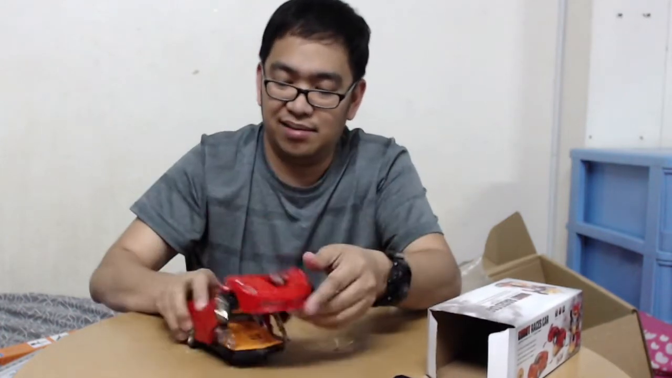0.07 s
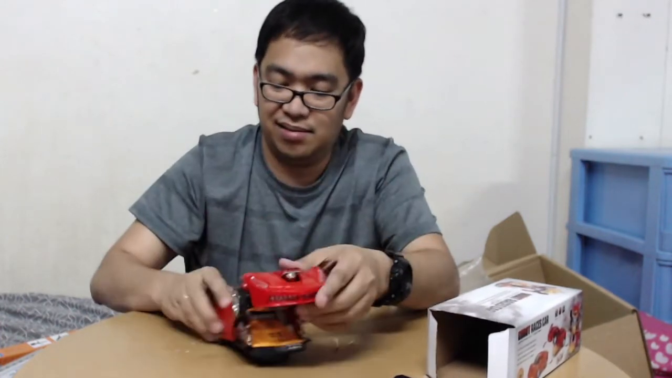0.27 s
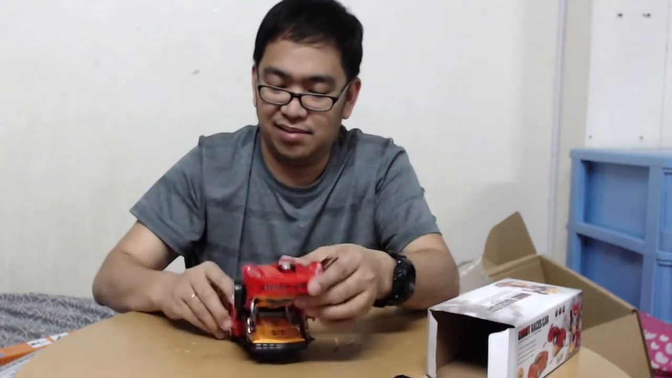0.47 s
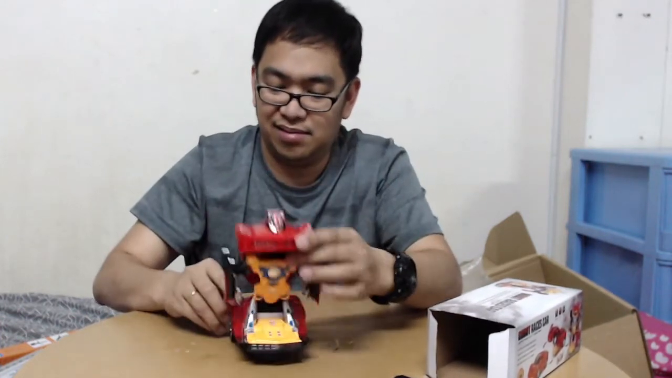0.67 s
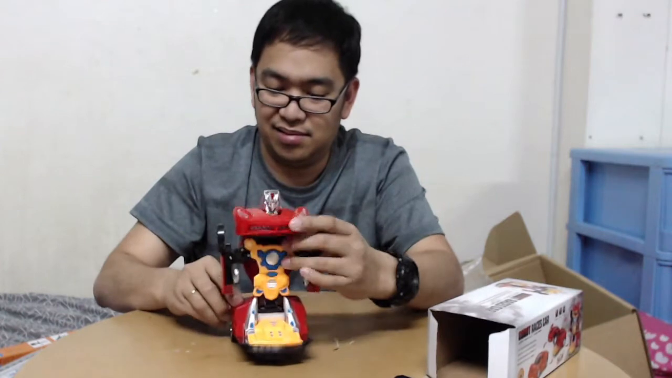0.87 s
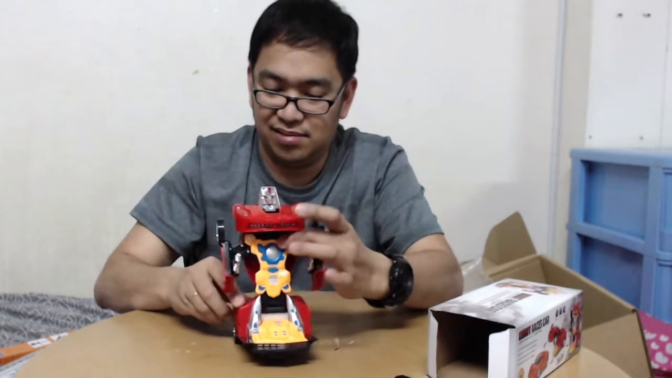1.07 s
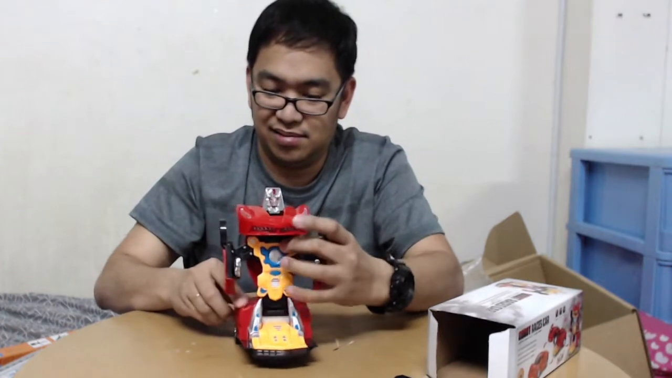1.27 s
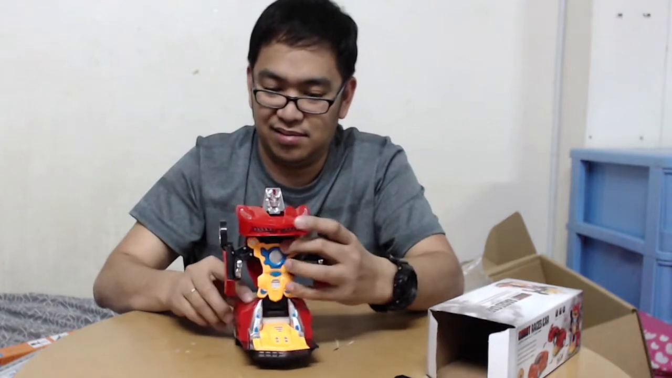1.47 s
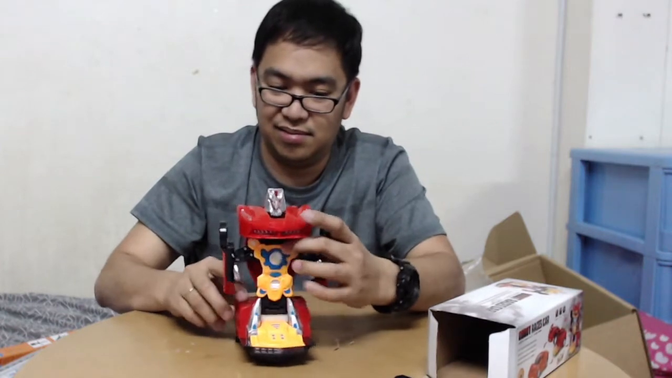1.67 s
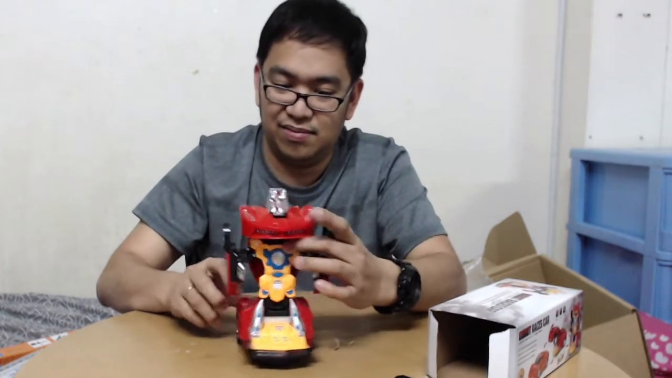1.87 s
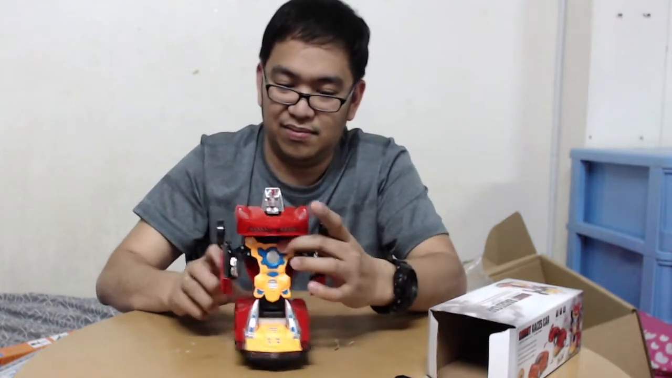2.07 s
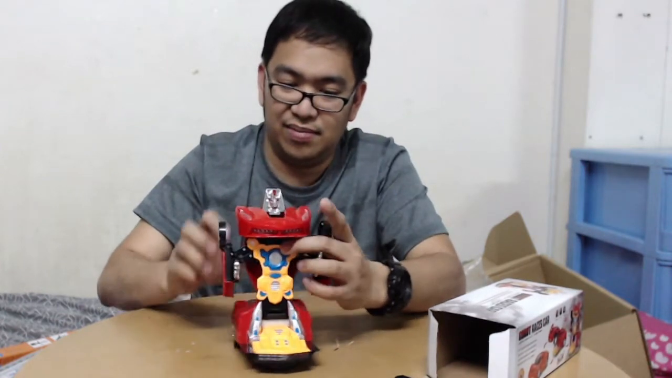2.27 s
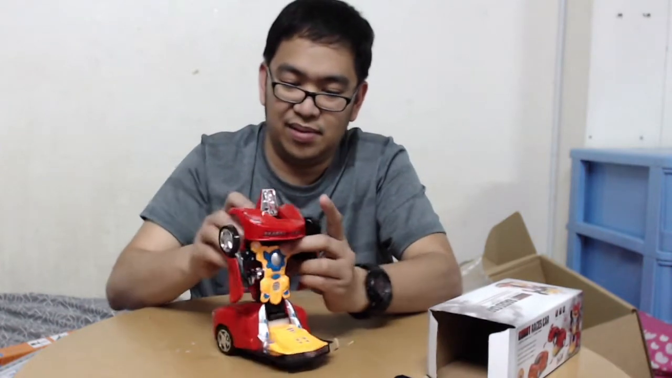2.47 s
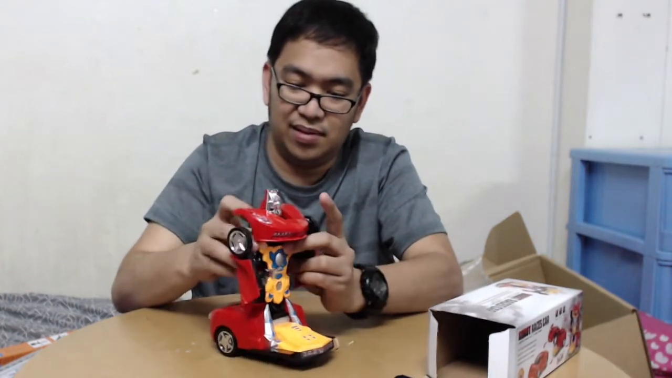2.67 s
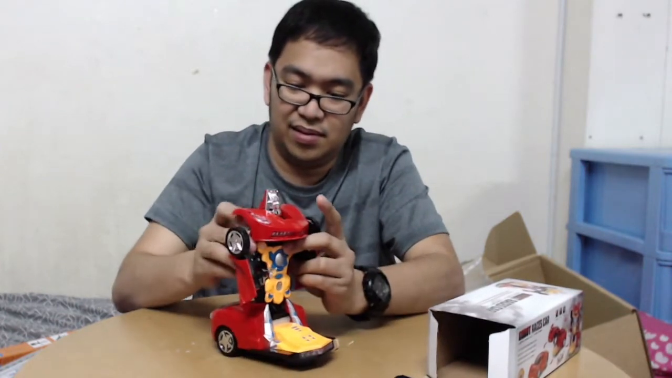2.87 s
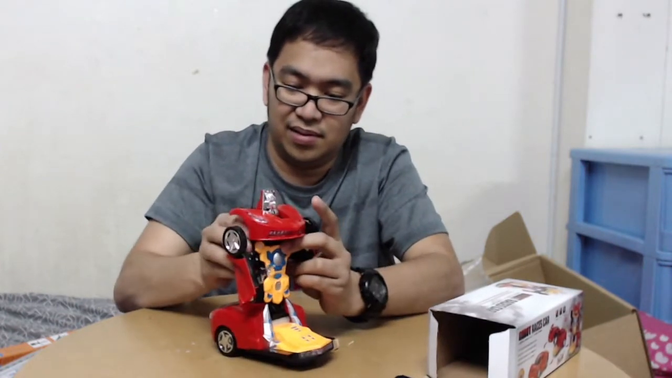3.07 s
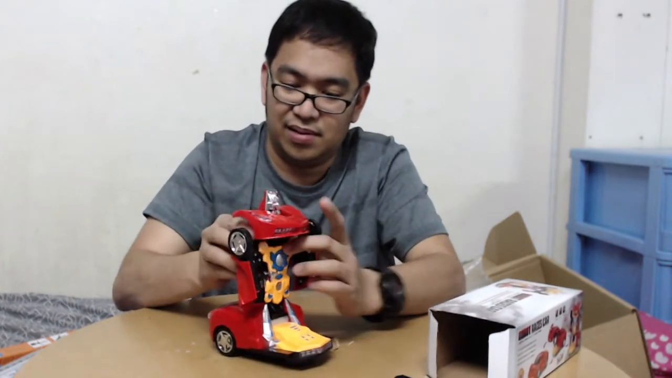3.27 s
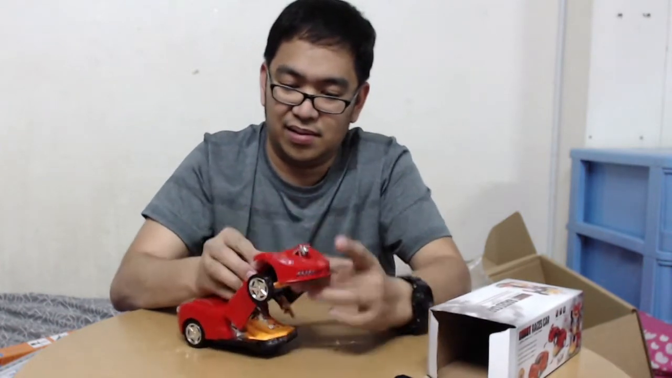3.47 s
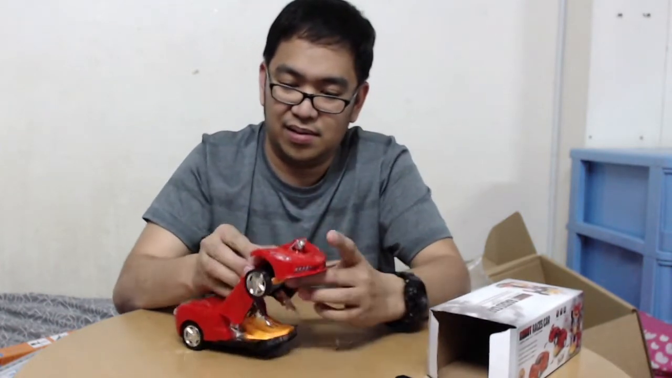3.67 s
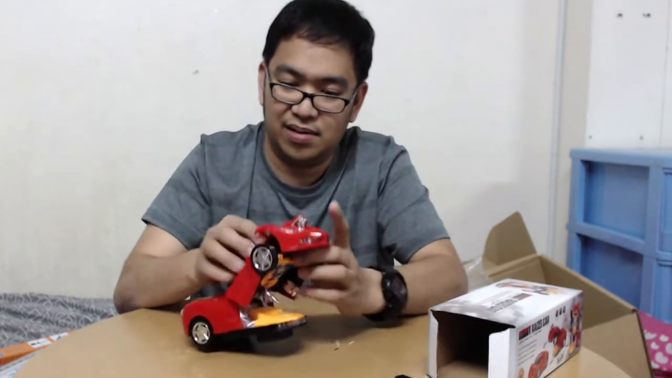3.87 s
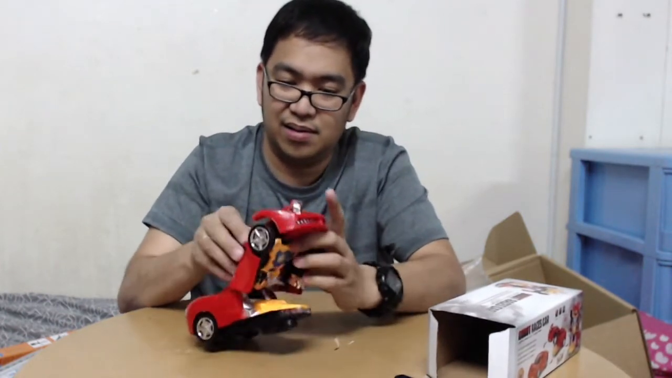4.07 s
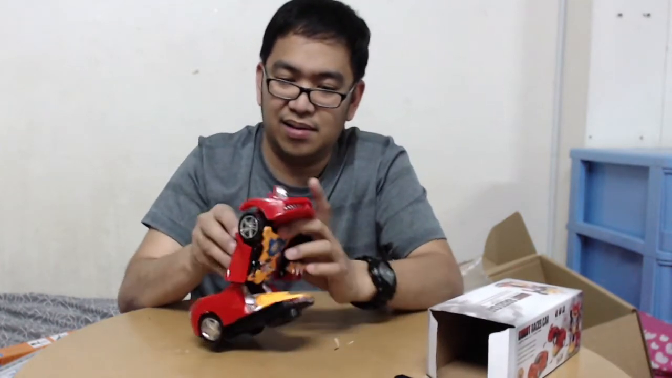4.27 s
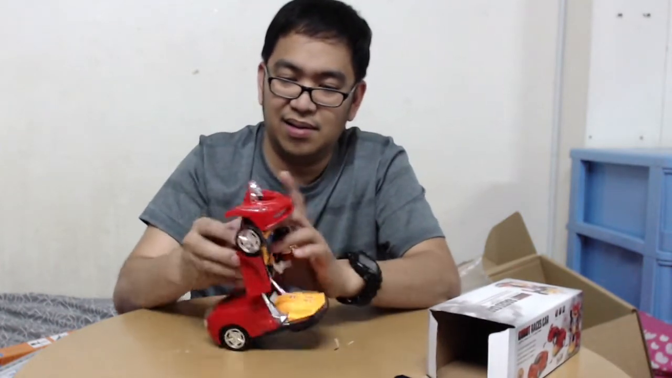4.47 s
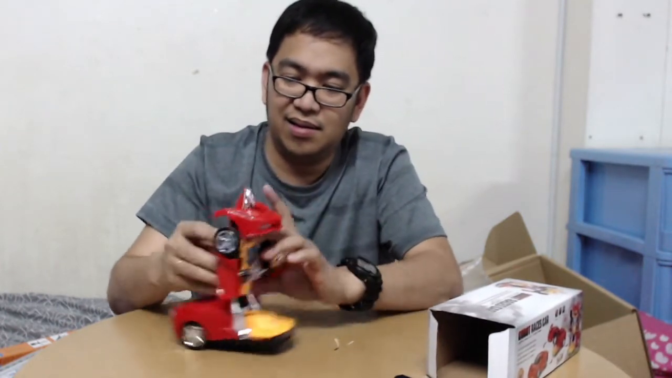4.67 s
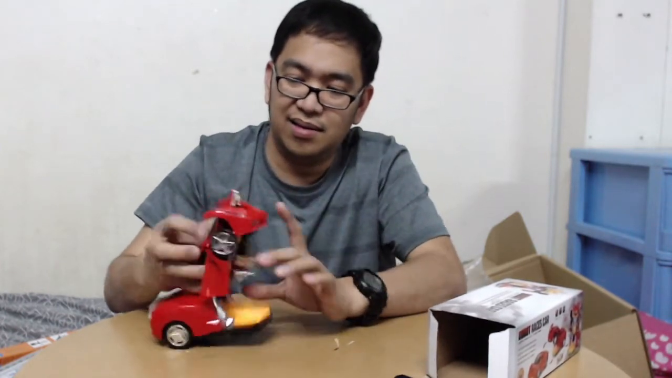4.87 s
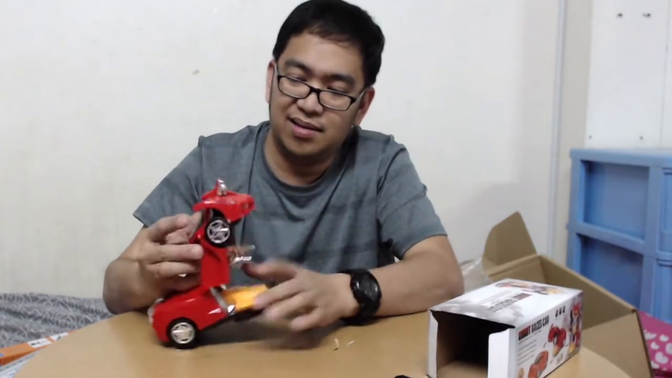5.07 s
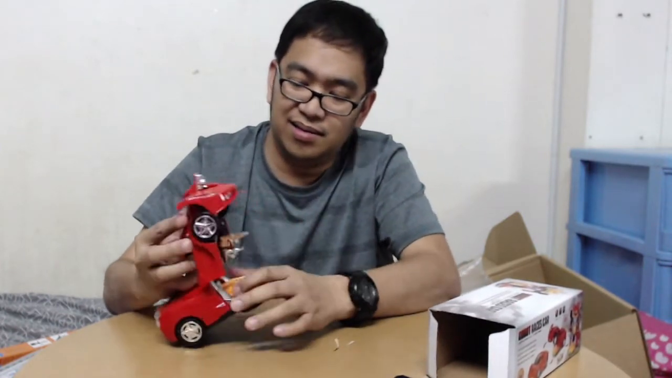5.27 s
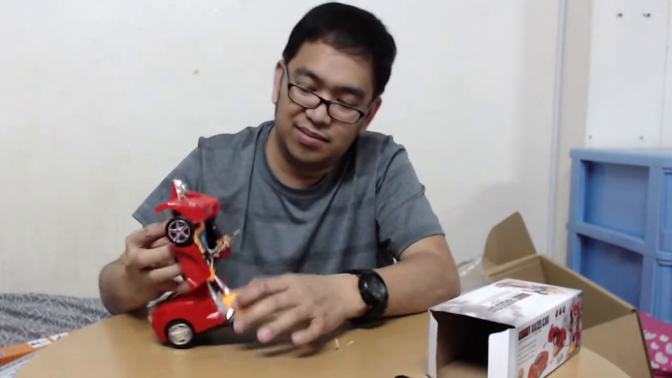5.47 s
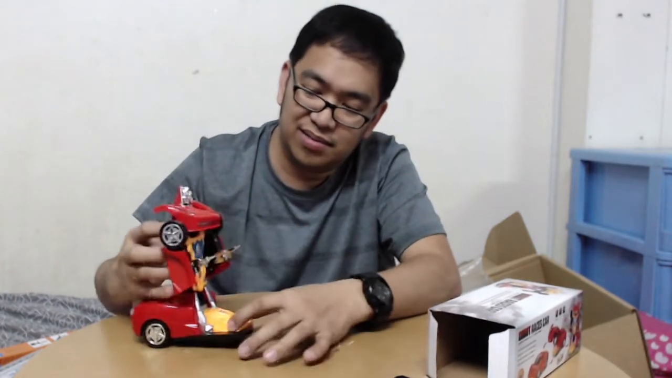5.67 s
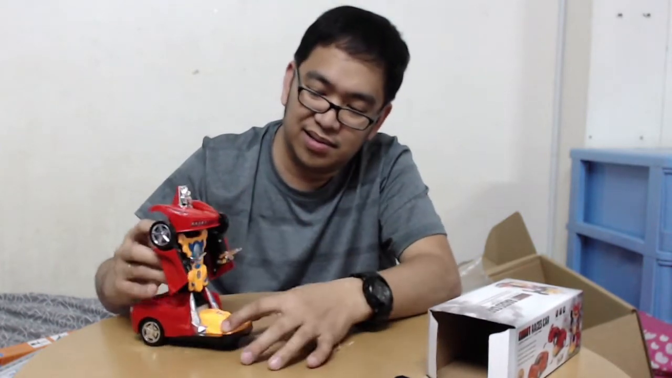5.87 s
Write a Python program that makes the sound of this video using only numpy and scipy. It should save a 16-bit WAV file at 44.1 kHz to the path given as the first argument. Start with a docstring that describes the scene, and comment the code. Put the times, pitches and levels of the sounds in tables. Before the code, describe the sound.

A hollow plastic toy car-robot is folded by hand on a light tabletop. A couple of knocks open, then a dense rattling cluster of clicks near one second, softer fumbling, sharp clacks past the middle, and a very loud snap near the end. Small room, fairly close microphone, faint low hum and hiss.

```python
"""Snaps, knocks and rattles of a hollow plastic toy car, folded and twisted by hands on a light table.
Each contact shakes the resonant parts of the toy and rings the part that was struck.
Rubbing joints and wheels add narrow squeaks, and a few ticks add bright crackle.
Bumps and dragging wheels make the table top boom in a few low modes.
Behind it lie a small room's echo and the steady noise of room and microphone."""
import sys
import numpy as np
from scipy import signal
from scipy.fft import rfft, irfft, next_fast_len
from scipy.io import wavfile
from scipy.ndimage import uniform_filter1d, map_coordinates

SR = 44100
rng = np.random.default_rng(int(sys.argv[2]) if len(sys.argv) > 2 else 0)


def bounce(signal):
    """Save signal as a 16-bit WAV file at the path given by the first command-line argument."""
    frames = np.transpose(np.atleast_2d(signal))
    limited = np.clip(frames, -1, 1)
    pcm = np.round(limited * 32767).astype(np.int16)
    wavfile.write(sys.argv[1], SR, pcm)


N = 260498

# Knocks and snaps in the toy; the last two are shares of the hollow body and the small loose parts:
# start_s, relative_level_db, struck_part_pitch_hz, body_share_db, small_parts_share_db
CONTACTS = [(.003, -4.5, 1572, -11.5, -28), (.093, -9.5, 1560, -6, -23), (0.175, -17.5, 1830, -5.5, -35),
            (.186, -19.5, 6900, -21, -14), (.22, -25, 1540, -19, -25), (.364, -32.5, 580, 1.5, -29),
            (.375, -20, 650, -5.5, -34), (.561, -26, 773, 0, -10.5), (.693, -28, 755, -18, -33),
            (.784, -23.5, 3670, -9.5, -11), (0.851, -11.5, 3090, -11, -12.5),
            (.871, -6.5, 2890, -5.5, -6.5), (.902, -11, 3680, -16, -11), (.954, -10.5, 2290, -20, -18),
            (.965, -11, 2200, -19, -12), (0.996, -10, 1600, -9.5, -19), (1.027, -12, 3410, -40, -10),
            (1.091, -21.5, 2010, -30, -9.5), (1.142, -25, 680, -9.5, -24), (1.164, -25, 680, -0.5, -48),
            (1.187, -20.5, 665, -7.5, -13), (1.254, -22, 670, -5, -21), (1.269, -9, 2820, -16.5, -6),
            (1.42, -28, 517, -12, -13), (1.668, -18, 640, -7, -16), (1.688, -29, 580, -23, -12),
            (1.749, -18.5, 893, -10.5, -41), (1.847, -25, 630, -9, -29), (1.875, -21, 910, -5, -19),
            (1.911, -18.5, 680, -2, -21), (1.936, -19, 1600, -19, -20), (1.985, -16, 670, -4.5, -28),
            (2.009, -15.5, 665, -15, -16.5), (2.055, -16, 716, -11.5, -16.5),
            (2.077, -23.5, 3120, -17, -15), (2.264, -26, 610, -27, -18), (2.296, -29, 3090, -16, -16),
            (2.311, -32, 630, -14, -21), (2.348, -25, 564, -9, -20), (2.378, -34, 1200, 7, -15),
            (2.449, -31, 1900, -3, -7), (2.462, -24, 1900, -5, -8.5), (2.669, -26, 3570, -21, -18),
            (3.076, -23.5, 570, -15, -16), (3.162, -22.5, 927, -17, -17), (3.232, -26.5, 2500, -23, -4.5),
            (3.274, -34, 1010, -21, -15), (3.324, -30, 937, 4.5, -21), (3.351, -6, 1970, -9, -16),
            (3.401, -6, 946, -11, -12.5), (3.413, -3.5, 623, -11.5, -13.5), (3.555, -31.5, 918, 1, -25),
            (3.639, -34, 726, 1, -16), (3.661, -15.5, 780, -12.5, -16), (3.866, -23, 730, -7, -5),
            (3.886, -11.5, 6300, -7, -2), (3.892, -10.5, 2980, -33, 2), (3.901, -6, 3400, -17, -3.5),
            (4.234, -21.5, 4400, -16, -4.5), (4.248, -16.5, 3500, -34, -6), (4.32, -25, 900, -4.5, -21),
            (4.395, -7, 1945, -9.5, -25), (4.441, -23, 6720, -12, 3), (4.475, -26, 3500, -15, -2),
            (4.53, -24, 880, 3.5, -30), (4.564, -18.5, 950, 0.5, -11), (4.578, -15, 2900, -1.5, -11.5),
            (4.597, -16.5, 900, -6.5, -22), (4.636, -9, 900, -7, -29), (4.649, -3.5, 1906, -7, -21),
            (4.676, -6.5, 3394, -25, -6), (4.721, -24.5, 2430, -16, 3), (4.793, -24.5, 875, -2, -20),
            (4.892, -13.5, 1805, -8.5, -13.5), (5.009, -35, 725, -22, -0.5),
            (5.124, -18.5, 2950, -26, -5.5), (5.13, -13.5, 1420, -15, -16), (5.195, -14, 3250, -25, -4.5),
            (5.207, -16, 3330, -25, -18), (5.285, -9, 5850, -25, -7), (5.296, -11, 3610, -21, -15),
            (5.409, -26, 800, 1, -22), (5.465, -17, 835, 0.5, -13), (5.508, 7, 1830, -19, -21),
            (5.512, -9, 2250, -33, -15), (5.524, -10.5, 795, -13, -10), (5.684, -26, 3830, -11, -12)]
# Bumps on the table: start_s, relative_level_db, second_mode_share_db, upper_modes_share_db
BUMPS = [(.002, -29, 5, -29), (.028, -33, 7, -12), (.178, -17, -24, -15), (.212, -26, -5, -2),
         (0.287, -26, -7, -18), (.37, -21.5, -20, -9), (0.565, -37.5, -24, 7), (0.853, -13, -7, -6),
         (0.878, -30, 2, -16), (0.918, -12, -8, -21), (0.998, -19.5, -14, -7.5), (1.172, -25, -16, -3),
         (1.249, -17.5, -18, -6), (1.291, -19, -4.5, -9.5), (1.597, -24.5, -12, -19), (1.666, -11, -13, -8),
         (1.699, -22, -1, -10), (1.864, -13, -12, -17), (1.91, -16, -23, -3), (1.996, -21, -21, -6),
         (2.052, -11, -15, -8), (2.079, -18.5, -0.5, -7), (2.288, -35, -21, 2), (2.359, -25, -25, -0.5),
         (2.429, -25, -4.5, -7), (2.498, -23.5, -13, -12), (2.796, -31.5, -9, -16), (3.038, -23, -12, -9.5),
         (3.263, -29, -24, -28), (3.349, -8, -8.5, -10), (3.402, -10, -3, -6), (3.548, -36.5, -23, 9),
         (3.643, -23, -24, -5), (3.906, -20.5, -31, -3.5), (4.226, -31.5, -27, 2), (4.401, -18, -8, -4),
         (4.531, -27, -23, -8), (4.58, -28, -30, 0), (4.654, -9, -15, -6), (4.719, -13.5, -6.5, -6.5),
         (4.789, -19, -12, -13), (5.051, -27, -21, -2), (5.266, -33, -25, 1), (5.4, -23, -27, -1.5),
         (5.464, -25, -25, 8.5), (5.519, -9, -26, -9), (5.548, -7.5, -9, -12), (5.577, -8.5, -23, -15),
         (5.684, -33.5, 4.5, -17)]
# Shoves that rock the whole table in its first mode: start_s, relative_level_db
ROCKS = [(.854, -25), (1.0, -42), (3.402, -31), (4.831, -29), (5.562, -32), (5.684, -33)]
# Rub of fingers, joints and wheels: time_s, table_drag_db, toy_rub_db, body_share_db (relative levels)
HANDLING = [(0, -18, -22, -14), (.11, -37.5, -57, 15.5), (.23, -27, -30.5, 0.5), (.4, -32.5, -54, 6.5),
            (.8, -47.5, -50, -1.5), (.97, -25, -28.5, -22), (1.08, -47, -59, -16), (1.63, -46.5, -53.5, 7),
            (1.688, -22, -33.5, -6), (1.81, -38, -79, -1), (1.889, -30.5, -34.5, 2.5), (2.2, -31, -63, 6),
            (2.3, -39.5, -42, 6.5), (2.41, -35.5, -43.5, 4), (2.5, -34, -42, 0.5), (2.67, -52, -58, -2),
            (2.89, -61, -45.5, -6.5), (3.05, -30.5, -51.5, 0), (3.24, -41.5, -51, -0.5),
            (3.342, -26, -29.5, -1), (3.53, -35, -44.5, 1), (3.7, -35, -50, 7), (3.95, -38, -36, -10),
            (4.2, -52.5, -55.5, 2), (4.29, -34.5, -41.5, 2.5), (4.52, -32, -41.5, -11),
            (4.62, -21, -32.5, 3.5), (4.74, -21.5, -27, -4.5), (4.94, -45.5, -48, 5.5),
            (5.17, -34, -38.5, -1.5), (5.38, -41.5, -40, -4), (5.48, -20, -33.5, 8), (5.56, -31, -32, -6),
            (5.68, -50, -63, 5.5), (5.91, -58, -49, -4.5)]
# A joint or wheel rubs and hisses at the pitch of one part: start_s, end_s, pitch_hz, level_db
SQUEAKS = [(0.177, 0.258, 7000, -39), (0.326, 0.443, 7140, -60), (0.952, 0.987, 5570, -23.5),
           (1.298, 1.39, 2850, -42.5), (1.907, 1.98, 11100, -54), (1.997, 2.056, 6700, -51),
           (2.313, 2.435, 7040, -49.5), (2.65, 2.743, 3670, -49.5), (2.807, 3.03, 2460, -50.5),
           (3.186, 3.303, 2480, -46.5), (3.347, 3.463, 6900, -35), (3.384, 3.524, 11040, -49.5),
           (3.46, 3.527, 5100, -44), (3.817, 3.905, 6330, -47), (4.003, 4.087, 6000, -48),
           (4.444, 4.55, 3600, -38), (4.631, 4.72, 7130, -33), (4.799, 4.984, 3500, -35.5),
           (5.193, 5.258, 9100, -44), (5.29, 5.382, 6560, -48), (5.674, 5.764, 3930, -55),
           (5.804, 5.887, 3020, -57)]
# Very short, bright ticks of a fingernail or pin: start_s, relative_level_db
TICKS = [(0.7832, -25), (1.6925, -26), (4.1037, -16.5), (5.878, -46)]
# Resonances, all with the columns: pitch_hz, width_hz, relative_level_db
# Hollow body of the toy
BODY_MODES = [(413, 33, 0.5), (498.5, 88, 1.5), (642, 160, -0.5), (744, 175, 0), (937, 104, 1),
              (1200, 306, -3), (1570, 530, -5.5)]
# Roof and floor panels
PANEL_MODES = [(1600, 770, -5), (2002, 180, 3.5), (2143, 145, 3), (2650, 490, 0)]
# Doors and arms
FLAP_MODES = [(3004, 346, -1.5), (3500, 580, 1), (4180, 1640, -7.5)]
# Small loose parts
SMALL_MODES = [(4360, 820, -1.5), (5840, 1080, 2), (7000, 1590, 0.5), (8870, 2020, -8)]
# Thin edges and pins
EDGE_MODES = [(9850, 640, 5), (11070, 1300, 0.5), (12600, 1300, -6), (15100, 960, -29)]
# Table top
TABLE_MODES = [(84.4, 4, -4.5), (122.9, 5.9, 0.5), (158.4, 4.06, -1.5), (217.4, 15.8, 0.5),
               (279.2, 8.6, -3.5), (308.2, 13.6, -2)]
# Time for the room's echo to fall by 60 dB: pitch_hz, fall_time_s
ROOM_DECAY = [(100, 0.08), (700, 0.18), (1900, 0.2), (5000, 0.22), (13000, 0.21)]
# Colour of the room and microphone noise: pitch_hz, relative_level_db_per_hz
QUIET_COLOUR = [(15, -32), (25, -9.5), (141, 2.5), (438, -20), (675, -14.5), (1010, -24), (1160, -25),
                (1360, -23), (2470, -18), (3700, -22.5), (8110, -25), (15900, -41)]

QUIET_DB = -46.5  # average level of that noise
TOP_HZ = 16000  # nothing sounds above this
PANEL_DB, FLAP_DB, RING_DB = -9, -4, -13  # starting shares, before the adjustments below
FALL_DB_PER_OCTAVE = 2.5  # panels and flaps answer less the further the struck part's pitch is from theirs
# Thin edges rattle with the small parts; flaps follow them by a fraction of their dB share
EDGES_UNDER_SMALL_DB, FLAPS_FOLLOW_SMALL = 17.5, 0.38
RING_YIELDS = 0.49  # the more a contact shakes body and small parts, the less the struck part rings
SMALL_RUB_DB = -6  # the small parts rub along with the panels
FIRST_MODE_DB, THIRD_MODE_DB = -26.5, -3.5  # shares alike for every bump
PUSH_DB = 26.5  # strength of a one-sample push behind a table level of 0 dB
SQUEAK_WIDTH = .075  # half width of a squeak, as a share of its pitch


def toy(rub):
    """Each contact is a blow and a short rattle into the shell, and rings the part that was struck."""
    t = np.arange(SR // 6) / SR
    # Rows everywhere: body, panels, flaps, small parts, edges; the big parts take most of the blow
    hardness = np.array([[2.2], [1.8], [.9], [.5], [.5]])
    blow = hardness * np.exp(-t / 0.00087) * (1 - np.exp(-t / 0.000091))
    # The treble swells in more slowly, over a few milliseconds
    swell_s = np.array([[.0005], [.001], [.002], [.003], [.003]])
    fade_s = np.array([[.01], [.011], [.013], [.014], [.013]])
    rattle = np.exp(-t / fade_s) * (1 - np.exp(-t / swell_s))
    shake = blow + rattle

    force, rings = np.zeros((5, N + SR)), np.zeros(N + SR)
    for start_s, db, hz, body_db, small_db in CONTACTS:
        at = round(start_s * SR)
        gain = amp(db - 5.5 + shares(hz, body_db, small_db)[:, None])
        force[:, at:at + len(t)] += gain * shake * grains(shake.shape, spread_db=3)

        shaken_power = amp(2 * body_db) + amp(2 * small_db)
        ring_db = RING_DB - RING_YIELDS * 10 * np.log10(shaken_power)
        waver = 0.081 * np.cumsum(rng.standard_normal(len(t)))  # plastic rings impurely
        swing = (1 - np.exp(-t * hz * 14.0)) * np.sin(2 * np.pi * hz * t + waver)
        rings[at:at + len(t)] += amp(db + ring_db - 60 * t / 0.039) * swing

    rub_force = rub[[0, 1, 1, 2, 2]] * amp([[0], [-3], [-3], [0], [-15]])
    force = force[:, :N] + rub_force
    parts = BODY_MODES, PANEL_MODES, FLAP_MODES, SMALL_MODES, EDGE_MODES
    shell = sum(resonate(push, modes) for push, modes in zip(force, parts))
    return patchy(shell, depth_db=2.2) + rings[:N]


def shares(hz, body_db, small_db):
    """Split a contact between body, panels, flaps, small parts and edges, in dB."""
    # Distance in pitch is taken from the second resonance of each group
    panels_away_db, flaps_away_db = [FALL_DB_PER_OCTAVE * abs(np.log2(hz / modes[1][0]))
                                     for modes in (PANEL_MODES, FLAP_MODES)]
    panel_db = PANEL_DB - panels_away_db
    flap_db = FLAP_DB - flaps_away_db + FLAPS_FOLLOW_SMALL * small_db
    return np.array([body_db, panel_db, flap_db, small_db, small_db - EDGES_UNDER_SMALL_DB])


def patchy(x, depth_db):
    """The grip keeps changing which parts are free to sound: random patches of gain in pitch and time."""
    spectrum = signal.stft(x, nperseg=256)[2]
    field = uniform_filter1d(rng.standard_normal(spectrum.shape), size=4, axis=0)
    field = uniform_filter1d(field, size=16, axis=1)
    return signal.istft(spectrum * amp(depth_db * unit(field)), nperseg=256)[1][:N]


def squeaks():
    """Rubbing makes grainy noise in a narrow band, which starts quickly and fades more slowly."""
    out = np.zeros(N + SR)
    for start_s, end_s, hz, db in SQUEAKS:
        progress = np.linspace(0, 1, round((end_s - start_s) * SR))
        limits_hz = [hz * (1 - SQUEAK_WIDTH), hz * (1 + SQUEAK_WIDTH)]
        band = signal.butter(2, limits_hz, "bandpass", fs=SR, output="sos")
        hiss = unit(signal.sosfilt(band, grains(len(progress), spread_db=4)))
        out[round(start_s * SR):][:len(progress)] += amp(db) * hiss * np.sin(np.pi * progress ** 0.5)
    return out[:N]


def ticks():
    """Each tick is a few milliseconds of crackle: fading noise, made bright by taking differences."""
    t, out = np.arange(SR // 50) / SR, np.zeros(N + SR)
    for start_s, db in TICKS:
        crackle = np.diff(rng.standard_normal(len(t) + 1))
        out[round(start_s * SR):][:len(t)] += amp(db - 12.5 - 60 * t / 0.015) * crackle
    return out[:N]


def table(drag):
    """A push down per bump makes the top boom; where it lands sets the share of each group of modes."""
    pushes = np.zeros((4, N))
    for start_s, db, second_db, upper_db in BUMPS:
        mode_db = np.array([FIRST_MODE_DB, second_db, THIRD_MODE_DB, upper_db])
        pushes[:, round(start_s * SR)] = amp(db + PUSH_DB + mode_db)
    for start_s, db in ROCKS:
        pushes[0, round(start_s * SR)] = amp(db + PUSH_DB)
    groups = TABLE_MODES[:1], TABLE_MODES[1:2], TABLE_MODES[2:3], TABLE_MODES[3:]
    boom = sum(resonate(push, modes) for push, modes in zip(pushes, groups))
    return boom + amp(-1.0) * resonate(drag, TABLE_MODES)


def handling():
    """Steady rubbing is a stream of tiny slips that push on table, body, panels and small parts."""
    time_s, *levels = np.transpose(HANDLING)
    drag_db, rub_db, body_db = [np.interp(np.arange(N) / SR, time_s, db) for db in levels]
    force = amp([drag_db, rub_db + body_db, rub_db, rub_db + SMALL_RUB_DB])
    # Slips come in clumps: a smooth random curve through 45 points per second
    clumps = map_coordinates(rng.standard_normal(N // 100), [np.arange(N) * 45 / SR])
    return force * amp(3.6 * clumps - 3.5) * grains((4, N), spread_db=2.5)


def room(x, count=20):
    """Echo tail dying by frequency; it changes in equal steps of time as the toy and the hands move."""
    hz, t, noise = signal.stft(rng.standard_normal((count, SR // 2)), SR, nperseg=256)
    decay = amp(-60 * t / along(ROOM_DECAY, hz)[:, None])
    tails = signal.istft(noise * decay, SR, nperseg=256)[1]
    # Each stretch of sound gets its own tail
    pieces = x * (np.arange(N) * count // N == np.arange(count)[:, None])
    wet = signal.fftconvolve(pieces, tails / np.linalg.norm(tails[0]), axes=1).sum(axis=0)
    return np.pad(wet, (250, 0))[:N]  # the echo comes 250 samples later


def quiet():
    """The steady hiss and rumble of room and microphone: noise shaped by pitch."""
    noise = filtered(rng.standard_normal(N), lambda hz: amp(along(QUIET_COLOUR, hz)))
    return amp(QUIET_DB) * unit(noise)


def resonate(x, modes, below=0.51, above=1.46):
    """Damped resonances, steep outside their range, scaled so that white noise keeps its level."""
    low_hz, high_hz = below * modes[0][0], above * modes[-1][0]

    def shape(f):
        """Add the resonances with alternating sign and cut off both sides."""
        edges = (1j * f / (low_hz + 1j * f) / (1 + 1j * f / high_hz)) ** 2
        total = 0
        for k, (hz, width_hz, db) in enumerate(modes):
            damping = 1j * f * width_hz
            total = total + (-1) ** k * amp(db) * damping / (hz * hz - f * f + damping)
        return edges * total

    return filtered(x, shape) / np.sqrt(np.mean(np.abs(shape(np.arange(SR // 2))) ** 2))


def grains(shape, spread_db):
    """Noise whose samples differ widely in size, like many tiny slips."""
    boost_db = spread_db * np.minimum(rng.standard_exponential(shape), 4)
    return unit(rng.standard_normal(shape) * amp(boost_db))


def filtered(x, response):
    """Multiply the spectrum of x by a response that depends on frequency."""
    m = next_fast_len(N + SR // 2)
    return irfft(rfft(x, m) * response(np.fft.rfftfreq(m, 1 / SR)), m)[..., :N]


def along(points, hz):
    """Read a value between (Hz, value) points on a log pitch axis."""
    f, values = np.transpose(points)
    return np.interp(np.log(hz + 1), np.log(f + 1), values)


def unit(x):
    """Scale x to an average (rms) level of 1."""
    return x / np.sqrt(np.mean(x ** 2) + 1e-20)


def amp(db):
    """Turn a level in dB into a gain."""
    return 10 ** (np.asarray(db) / 20)


def scene():
    """Toy and table in the room; the boom of the table is too deep for the echo to matter."""
    rub, tick = handling(), ticks()
    car = toy(rub[1:]) + squeaks()
    echo = amp(-2.5) * room(car + amp(-15) * tick)
    return (car + echo + tick + table(rub[0]) + quiet())[None]


def record(dry):
    """The loudest snap clips at full scale, then everything above the band limit is removed."""
    return filtered(np.clip(dry, -1, 1), lambda hz: hz < TOP_HZ)


dry = scene()
out = record(dry)
bounce(out)
```